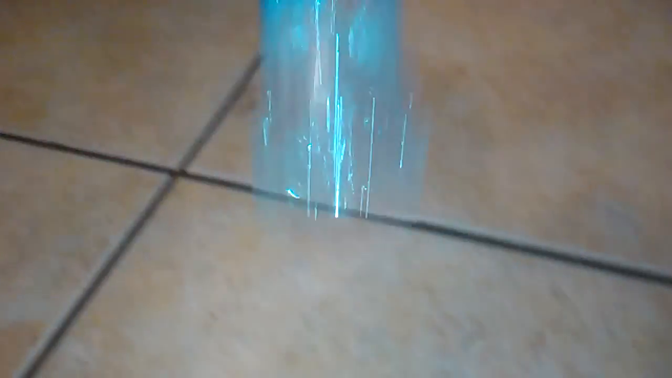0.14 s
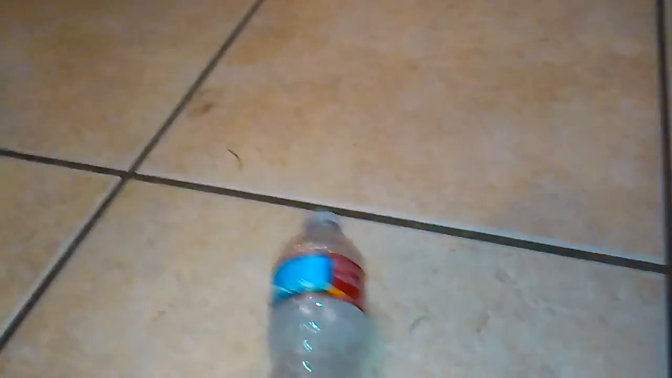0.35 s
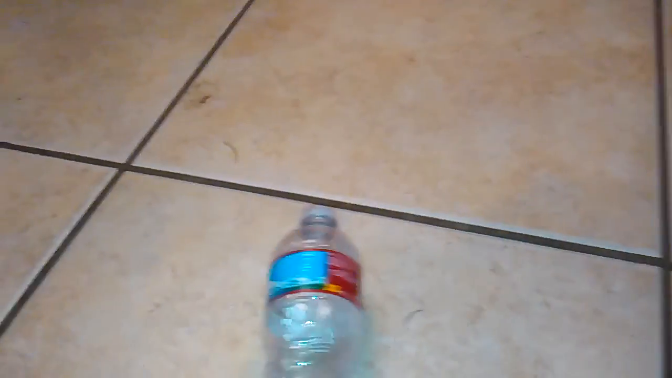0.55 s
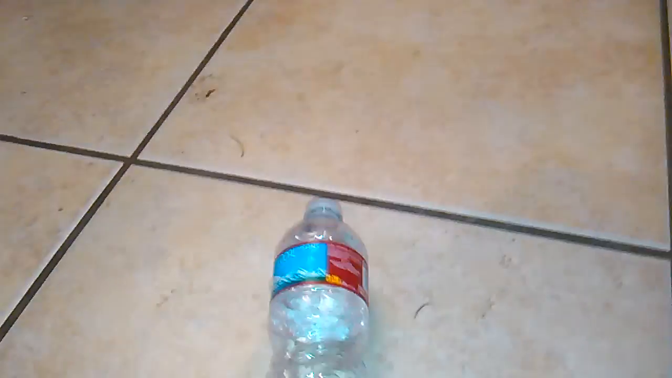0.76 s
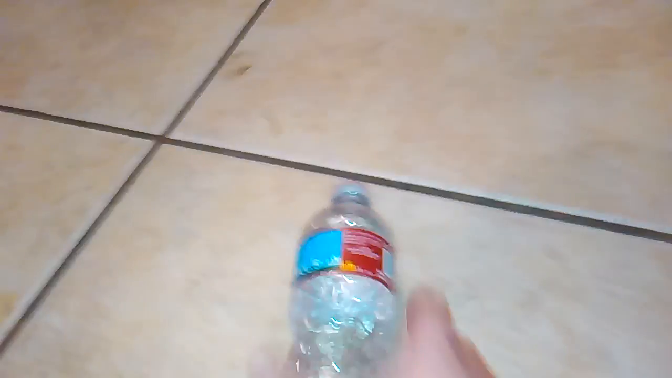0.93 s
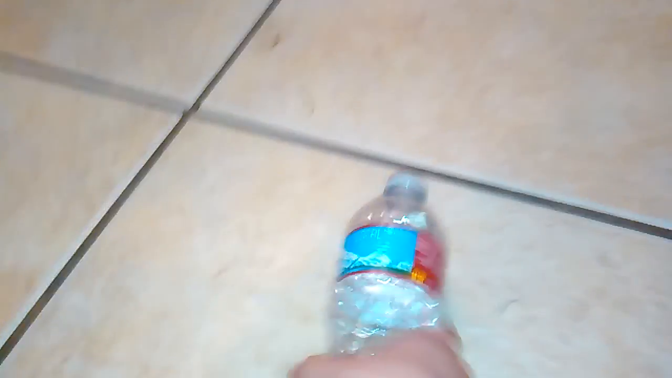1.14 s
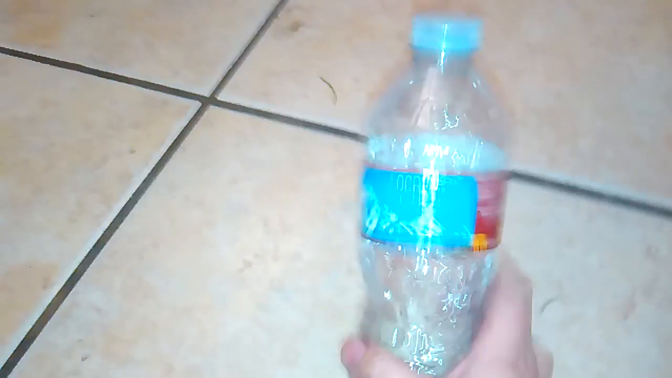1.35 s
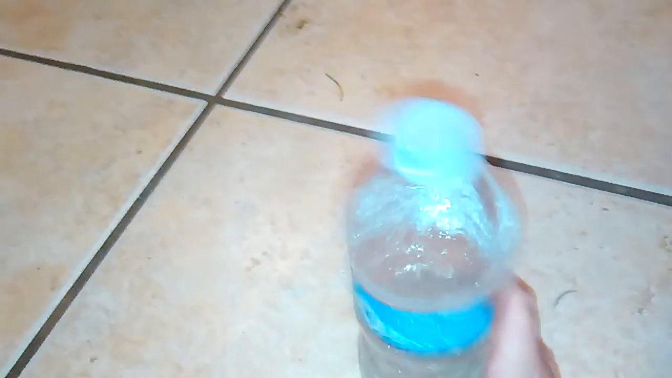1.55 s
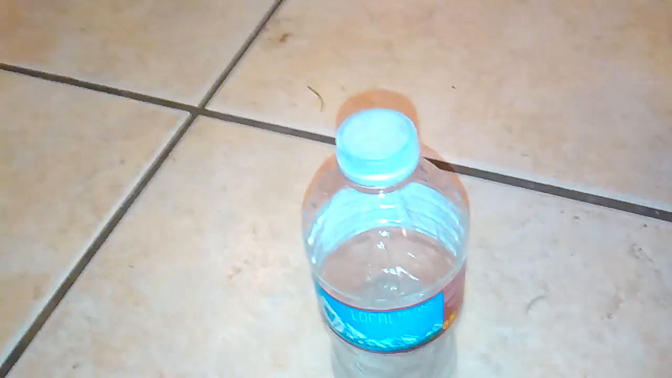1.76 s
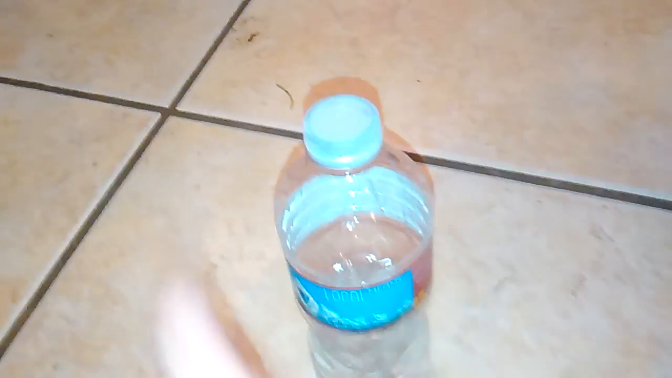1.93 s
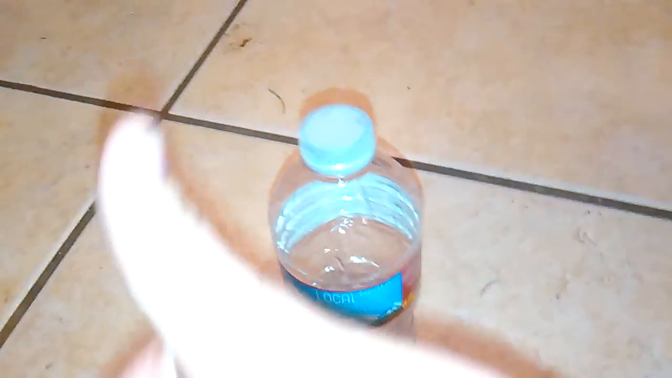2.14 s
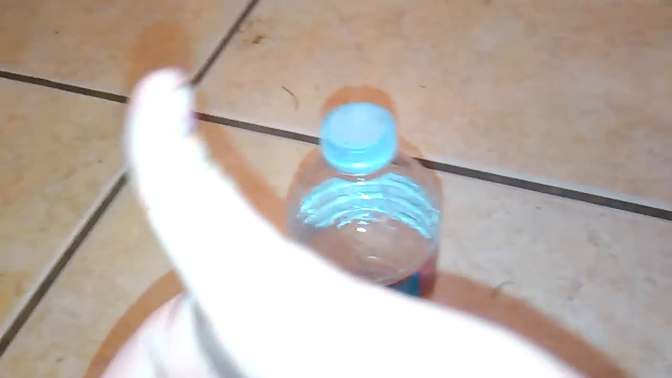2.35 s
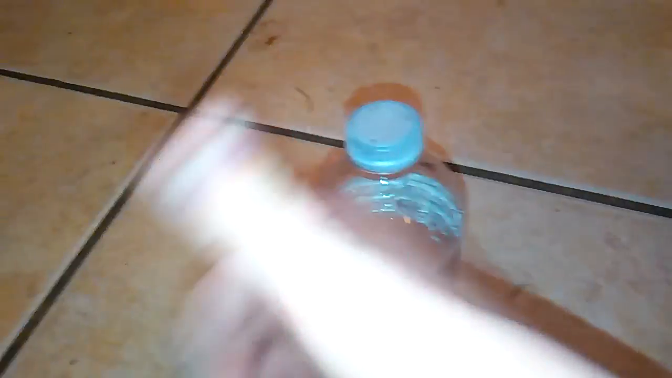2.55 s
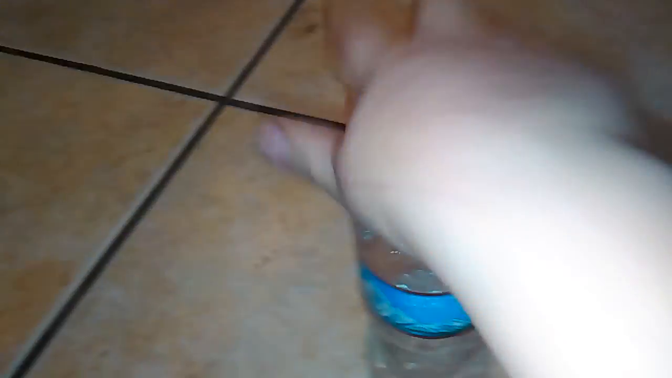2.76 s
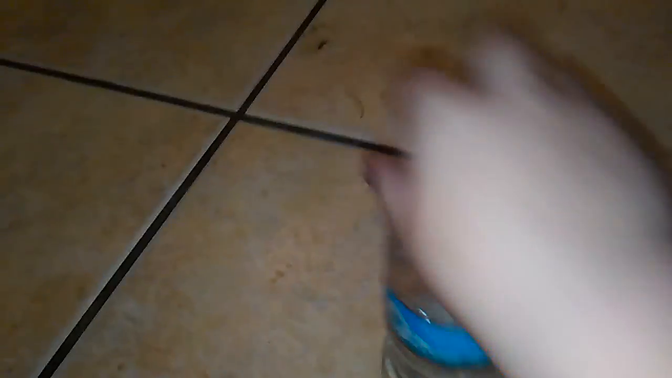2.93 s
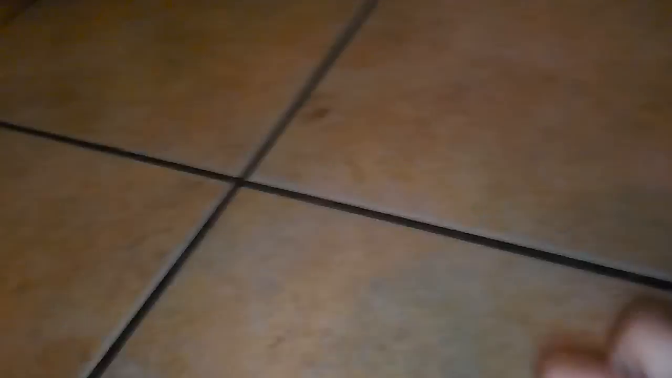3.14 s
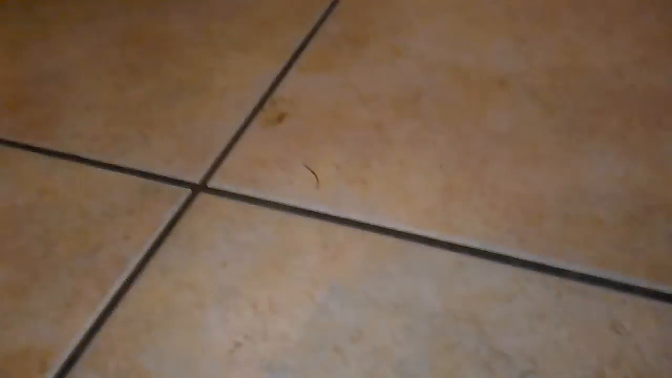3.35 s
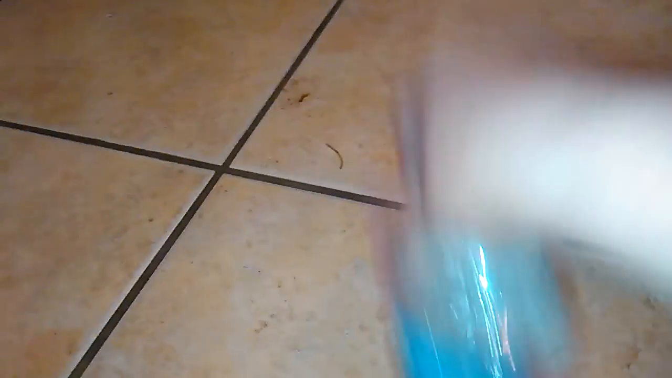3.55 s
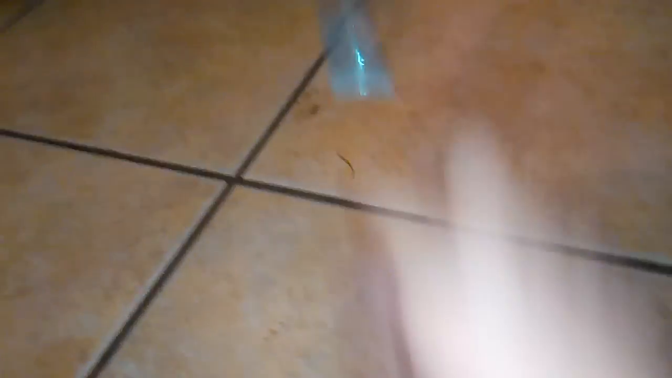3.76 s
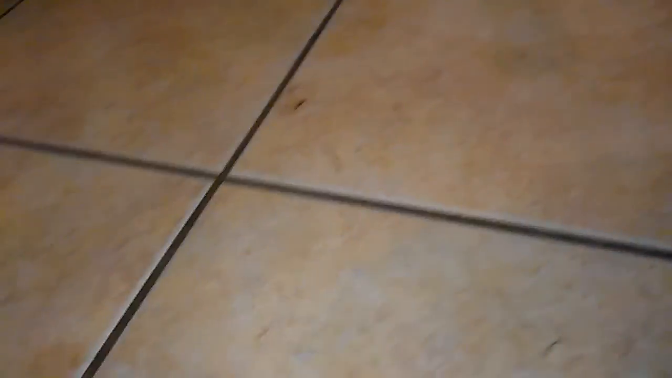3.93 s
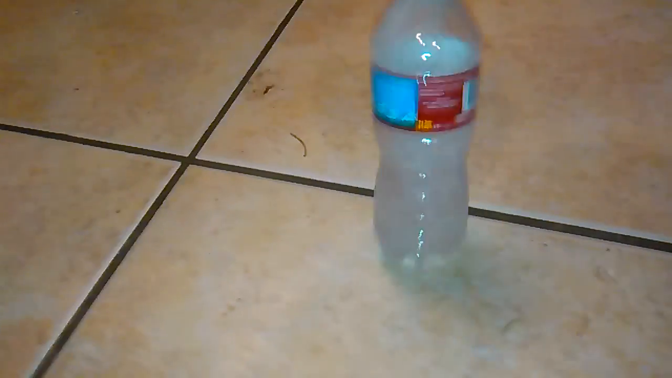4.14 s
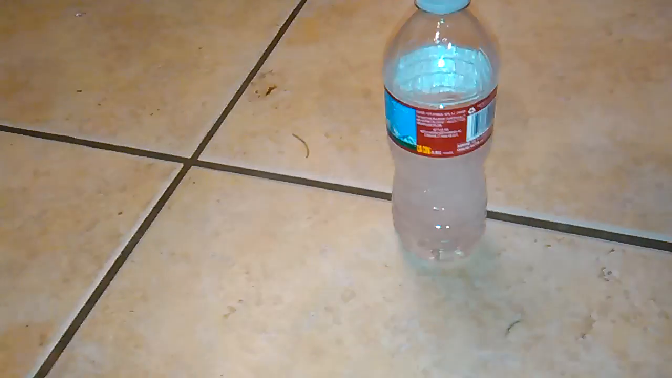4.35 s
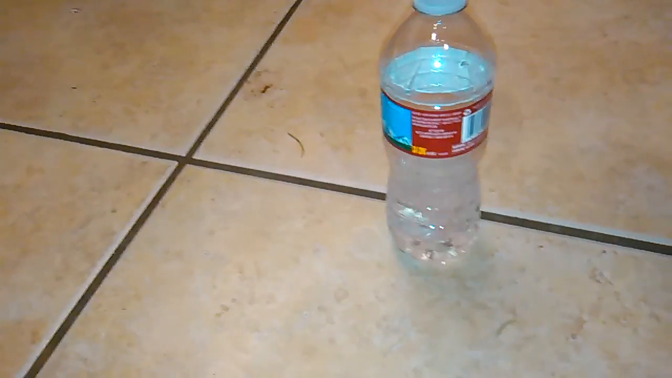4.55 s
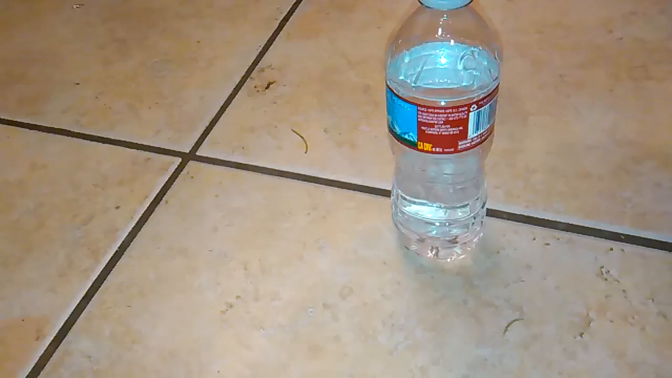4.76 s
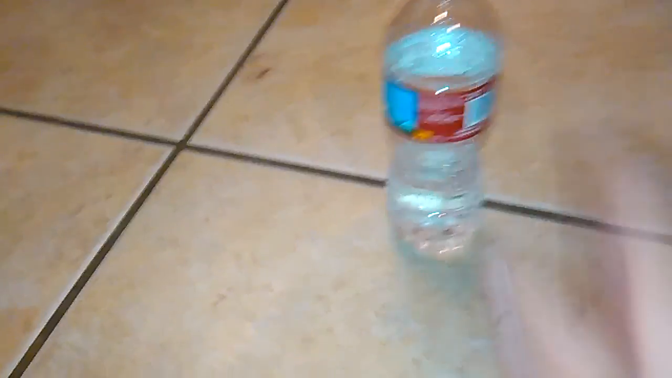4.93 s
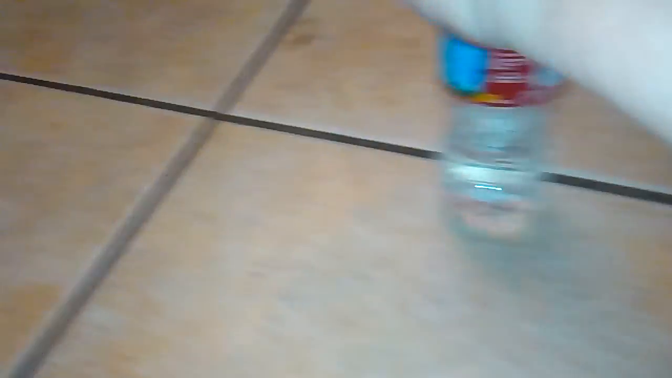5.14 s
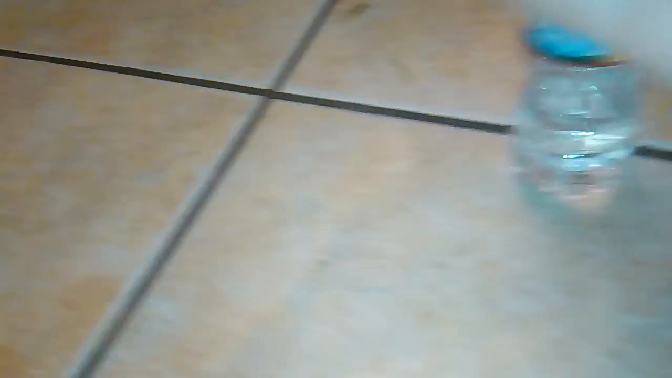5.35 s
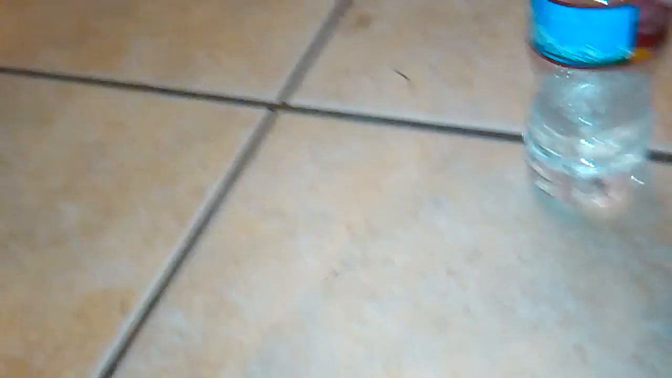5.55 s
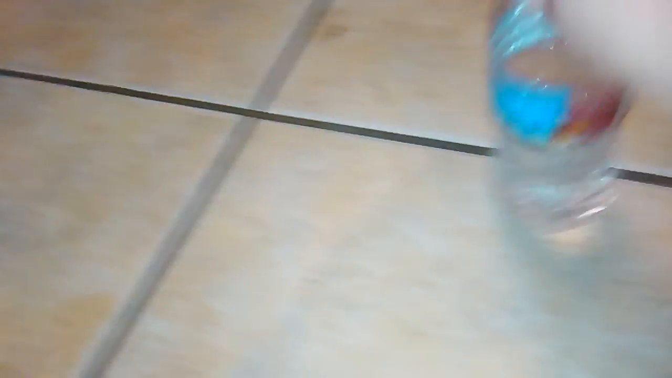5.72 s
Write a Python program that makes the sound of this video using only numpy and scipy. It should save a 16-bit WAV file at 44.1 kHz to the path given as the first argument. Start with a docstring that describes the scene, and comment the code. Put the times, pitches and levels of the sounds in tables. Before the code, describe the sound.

A small tiled room with faint low mains hum and soft hush. Light plastic crinkling and ticks come first, then at 0.3 s a part-filled bottle hits the floor: a loud, hollow, cracking thunk with a second bounce within 0.05 s, a thin ring hanging on, and a blunt tap at the right microphone at 0.4 s. Quiet follows, with a tiny gurgle at 1.1 s, dull hand knocks at 1.5 s and brief crinkling to 1.8 s. Soft bumps and faint slosh come at 2.7-3.0 s. At 3.75 s water gulps upward in pitch, with a knock at 3.8 s and small dent pops near 4.0 s. The second landing at 4.2 s is a heavier, watery cluster of thunks, its slosh fading over half a second. Handling knocks, a barely audible squeak and slosh come around 5.5 s, then a crisp dent snap at 5.8 s. Short bright reverberation; sound leans right, left duller.

```python
"""In a small tiled room, a thin plastic bottle partly filled with water is flipped twice and lands on the floor.
Landings, knocks and dents excite damped modes of water, belly, wall and ribs, with noise bursts for buckling.
Between throws a hand grabs and crinkles it: resonant grains give the crinkling and the sloshing water.
Sine-wave mains hum and coloured noise fill the room, whose reverberation is convolved with decaying noise.
The left microphone is shaded and dull, the right one bright."""
import sys
import numpy as np
from scipy import signal
from scipy.fft import rfft, irfft, next_fast_len
from scipy.io import wavfile
from scipy.ndimage import uniform_filter1d

SR = 44100
rng = np.random.default_rng(int(sys.argv[2]) if len(sys.argv) > 2 else 0)


def pcm_store(signal):
    """Save signal as 16-bit PCM."""
    levels = np.round(np.clip(np.atleast_2d(signal), -1, 1) * 32767)
    wavfile.write(sys.argv[1], SR, levels.astype(np.int16).T)


N = 259749
TIME = np.arange(N) / SR  # whole scene [s]
AGE = np.arange(int(.25 * SR)) / SR  # time since the start of one event [s]

# Colour of the plastic as it buckles: (frequency [Hz], gain [dB])
BUCKLE_COLOUR = [(300, -24), (700, -11.5), (1200, 0.5), (1900, 5), (3000, -1), (4500, -2.5), (7000, -11),
                 (14000, -28)]


def from_db(db):
    """Amplitude gain is the antilogarithm of a twentieth of the level in decibels."""
    return 10 ** (np.asarray(db) / 20)


def at_hz(points, hz):
    """Linear interpolation along a logarithmic frequency axis."""
    f, value = np.transpose(points)
    return np.interp(np.log(np.maximum(hz, 1)), np.log(f), value)


def rms_one(x, size=None):
    """Normalisation: the first `size` samples (or all) are given a root mean square of 1."""
    return x / np.sqrt(np.mean(x[..., :size] ** 2) + 1e-20)


def add(track, s, sound):
    """Superposition: a sound is summed into a track from time s."""
    i = max(int(round(s * SR)), 0)
    track[i:i + len(sound)] += sound[:max(N - i, 0)]


def colour(x, points):
    """Minimum-phase filtering: folding the cepstrum makes the given dB curve causal."""
    size = 4096
    gain_db = at_hz(points, np.fft.rfftfreq(size, 1 / SR))
    cepstrum = irfft(np.log(from_db(gain_db)), size)
    cepstrum[1:size // 2] *= 2
    cepstrum[size // 2 + 1:] = 0
    response = irfft(np.exp(rfft(cepstrum)), size)
    response = response.reshape((1,) * (x.ndim - 1) + (-1,))
    return signal.oaconvolve(x, response, axes=-1)[..., :x.shape[-1]]


def diffuse(size):
    """Diffuse-field coherence: stereo white noise, alike in the bass and unrelated in the treble."""
    # Likeness of the two channels: (frequency [Hz], correlation [-1 to 1])
    likeness = [(130, 0.82), (300, 0.8), (620, 0.19), (1400, 0)]
    padded = next_fast_len(size, real=True)
    mid, side = rfft(rng.standard_normal((2, padded)))
    alike = np.clip(at_hz(likeness, np.fft.rfftfreq(padded, 1 / SR)), -1, 1)
    common = np.sqrt((1 + alike) / 2) * mid
    opposed = np.sqrt((1 - alike) / 2) * side * [[1], [-1]]
    return irfft(common + opposed, padded)[:, :size]


def snaps(size, per_s, spread_db):
    """Random impulse process: clicks at chance moments, of uneven strength and either sign."""
    strength = from_db(spread_db * np.minimum(rng.exponential(1, size), 4))
    return (rng.random(size) < per_s / SR) * strength * rng.choice([-1, 1], size)


def crumple(seconds):
    """Impulsive excitation: a flurry of tiny buckles decays exponentially, with total energy 1."""
    flurry = snaps(len(AGE), per_s=9000, spread_db=5.5) * np.exp(-AGE / max(seconds, .001))
    return flurry / (np.linalg.norm(flurry) + 1e-12)


def resonate(x, hz, width):
    """Damped resonance: a two-pole filter whose bandwidth is a share of its pitch."""
    r = np.exp(-np.pi * width * hz / SR)
    return signal.lfilter([1, 0, -1], [1, -2 * r * np.cos(2 * np.pi * hz / SR), r * r], x + 1e-18)


def grains(clicks, pitches, width):
    """Granular excitation: every click is dealt to one of the resonances, where it rings briefly."""
    dealt = rng.integers(0, len(pitches), N)
    return sum(resonate(clicks * (dealt == k), hz, width) for k, hz in enumerate(pitches))


def ring(low, high, centre_hz, damping, focus_db=0, vary_db=0, detune=0, below_db=0):
    """Modal synthesis: damped sines, weighted by the struck spot and detuned by the lie of the water.

    damping is in dB per s; focus_db and below_db are losses per octave from, and further below, centre_hz."""
    # Bottle modes, from water mass to stiff wall and ribs:
    # (nominal frequency [Hz], relative level [dB], t60 before extra damping [s])
    bottle_modes = [(61, -12, .3), (86, 0, .08), (140, -4, .1), (189, 0, .13), (218, -9, .05),
                    (259, -7, .08), (338, -4, .08), (404, -10, .08), (459, -7, .09), (650, -7, .06),
                    (745, -2, .05), (818, 0, .08), (885, -4, .05), (965, -4, .05), (1092, -3, .07),
                    (1178, -4, .07), (1310, -9, .04), (1600, -2, .03), (1800, 0, .035), (2060, -1, .03),
                    (2450, -3, .03), (2760, -4, .03), (3200, -6, .025), (3750, -2, .025), (4300, -5, .02),
                    (5250, -6, .02)]
    in_range = [mode for mode in bottle_modes if low <= mode[0] < high]
    hz, level_db, t60 = np.transpose(in_range)[:, :, None]
    octaves = np.log2(hz / centre_hz)
    strength_db = level_db - focus_db * np.abs(octaves) + below_db * np.minimum(octaves, 0)
    strength_db = strength_db + vary_db * rng.standard_normal(hz.shape)
    hz = hz * (1 + detune * rng.uniform(-1, 1, hz.shape))
    decay_db = (60 / t60 + damping) * AGE
    return np.sum(from_db(strength_db - decay_db) * np.sin(2 * np.pi * hz * AGE), axis=0)


def shaken(modes, seconds, rough):
    """Convolution: modes answer one firm contact and the flurry of buckles that follows it."""
    return modes + rough * signal.fftconvolve(modes, crumple(seconds))[:len(AGE)]


def blow(thump_db, belly_db, wall_db, rib_db, crack_db, seconds, belly_hz, wall_hz,
         damping=0, belly_give_s=0.00044, give_s=.0012, water_lag_s=.002):
    """Impact excitation: one blow moves water, flexes belly, rings wall and ribs, and cracks thin plastic."""
    # Slap of water against the wall: (frequency [Hz], gain [dB])
    slap_colour = [(100, 2), (250, 5), (550, -6.5), (800, -2), (1150, -3), (1600, -17.5), (3000, -20.5),
                   (8000, -39)]
    # Cracking plastic: (frequency [Hz], gain [dB])
    crack_colour = [(1500, -33.5), (3500, -22.5), (5500, -6), (7500, -2.5), (9000, 0), (11000, -5.5),
                    (14500, -15.5)]
    water, belly, wall, ribs = (0, 150), (150, 550), (550, 1450), (1450, 6000)  # mode ranges [Hz]

    # soft plastic yields before it pushes back
    give = 1 - np.exp(-AGE / give_s)
    belly_give = 1 - np.exp(-AGE / belly_give_s)
    water_rise = 1 - np.exp(-AGE / water_lag_s)

    # the favoured rib pitch climbs an octave per 9.5 dB of crack over wall
    rib_hz = 2090 * 2 ** ((crack_db - wall_db) / 9.5)
    water_ring = ring(*water, belly_hz, damping)
    belly_ring = ring(*belly, belly_hz, damping, focus_db=5.0, vary_db=1.8, detune=.025, below_db=9)
    wall_ring = ring(*wall, wall_hz, damping, focus_db=7, vary_db=2.0, detune=.012)
    rib_ring = ring(*ribs, rib_hz, damping, focus_db=5, vary_db=2.0, detune=.08)

    # the wet wall slaps broadly around its strongest mode
    slap = colour(resonate(crumple(1.4 * seconds), wall_hz, width=1.1), slap_colour)
    # ribs mostly buckle and only half ring
    buckling = rms_one(colour(crumple(1.7 * seconds), BUCKLE_COLOUR))
    buckling = buckling + .4 * rms_one(shaken(rib_ring, seconds, rough=1.8))
    crack = give * colour(crumple(1.1 * seconds), crack_colour)

    parts = [(thump_db - 4.5, water_rise * water_ring),
             (belly_db - 4.0, belly_give * shaken(belly_ring, seconds, rough=0.38)),
             (wall_db - 3.0, give * shaken(wall_ring, seconds, rough=0.65)),
             (wall_db - 1.0, slap),
             (rib_db - 3.5, buckling),
             (crack_db - 9, crack)]
    return sum(from_db(db) * rms_one(part, size=900) for db, part in parts)


def background():
    """Stationary sources: harmonic mains hum over the soft rumble and hiss of a quiet room."""
    # Mains hum: (frequency [Hz], rms level before the channel trim [dB])
    hum_partials = [(60, -73.5), (120, -70.5), (180, -85), (240, -81.5), (300, -94), (360, -89)]
    # Room hush: (frequency [Hz], gain [dB])
    hush_colour = [(20, -18), (35, -9.5), (62, -4.5), (95, -3.5), (140, -6), (250, -13), (500, -18),
                   (1000, -26.5), (2000, -28.5), (4500, -33), (7000, -33), (10000, -29.5), (14500, -30.5)]
    hum = 0
    for hz, db in hum_partials:
        phase = rng.random()  # radians after the factor of 2 pi
        hum = hum + from_db(db) * np.sqrt(2) * np.sin(2 * np.pi * (hz * TIME + phase))
    hush = from_db(-68.5) * rms_one(colour(diffuse(N), hush_colour))
    # channel trims [dB], left then right
    return hum * from_db([[-1.2], [.6]]) + hush * from_db([[-.6], [.6]])


def knocks(crumple_s=0.0064, unevenness=.25, count=7):
    """Damped impact: a held bottle flexes mainly at the belly, then its base rocks in ever lighter touches."""
    # Dull knocks as the hand grabs, nudges or sets down the bottle: (time [s], relative belly level [dB],
    # relative wall level [dB], relative crack level [dB], strongest belly mode [Hz], rocking decay time [s])
    knock_table = [(0.0034, -48.5, -65, -62, 209, 0.0042), (1.5053, -31.5, -51.5, -49, 336, 0.04),
                   (1.5130, -30, -45.5, -40, 157, 0.02), (2.006, -54.5, -79, -80, 190.4, 0.0041),
                   (2.7020, -40, -52.5, -64, 275, 0.0028), (2.7178, -33, -43, -55.5, 250, 0.017),
                   (2.8604, -38.5, -56.5, -48, 185, 0.0044), (3.0394, -45, -71, -68, 250, .003),
                   (3.8246, -29, -47.5, -56.5, 200, 0.01), (5.472, -49.5, -68.5, -63.5, 183, 0.012),
                   (5.5276, -35, -48.5, -66, 358, 0.063), (5.8058, -44.5, -52.5, -51.5, 306, .005)]
    wall_hz, hand_damping_db_per_s, finger_give_s = 670, 799.5, .0035
    rock_gap_s, rock_db = 0.019, -3  # mean gap; touch level before the rocking decay
    out = np.zeros(N)
    for s, belly_db, wall_db, crack_db, belly_hz, rocking_s in knock_table:
        # a knock low on the belly moves more water
        thump_db = belly_db - 12 - 16.5 * np.log2(belly_hz / 200)
        rib_db = (wall_db + crack_db) / 2 - 11.5
        knock = blow(thump_db, belly_db, wall_db, rib_db, crack_db, crumple_s, belly_hz, wall_hz,
                     hand_damping_db_per_s, finger_give_s)
        add(out, s, knock)
        gaps = rock_gap_s * (1 + unevenness * rng.uniform(-1.3, 1, count))
        for later in np.cumsum(gaps):
            touch = from_db(rock_db) * np.exp(-later / rocking_s) * knock
            add(out, s + later, rng.choice([-1, 1]) * touch)
    return out


def room(x, build_s=0.0039):
    """Reverberation: reflections off tiles and walls thicken quickly and decay exponentially band by band."""
    # Decay: (frequency [Hz], t60 [s])
    room_t60 = [(60, .42), (250, .35), (1000, .35), (2500, .36), (8000, .29), (14000, .25)]
    # Strength against the direct sound before channel gains: (frequency [Hz], level [dB])
    room_level = [(60, -13), (250, -7), (700, -12.5), (2000, -7.5), (5000, -12), (12000, -8)]
    t = TIME[:SR // 2]
    hz = np.fft.rfftfreq(len(t), 1 / SR)
    noise = rfft(diffuse(len(t)))
    response = 0
    centres = np.geomspace(60, 15000, 9)
    for centre, share in zip(centres, np.eye(len(centres))):
        # overlapping triangular bands on the log-frequency axis
        band = irfft(noise * at_hz(np.c_[centres, share], hz), len(t))
        decay = np.exp(-np.log(1000) * t / at_hz(room_t60, centre)) * (1 - np.exp(-t / build_s))
        response = response + from_db(at_hz(room_level, centre)) * band * decay / np.linalg.norm(decay)
    return signal.oaconvolve(x[None], response, axes=1)[:, :N]


def ticks(width=.22, snap_s=0.0064):
    """Impulse response of a resonance: a crease pops and rings for an instant around its own pitch."""
    # Loudest creases snapping in the wall: (time [s], relative level [dB], pitch [Hz])
    creases = [(0.0812, -49, 10300), (0.152, -53, 9550), (0.2344, -58, 3090), (0.6695, -54, 9200),
               (0.6988, -61.5, 5916), (1.622, -45, 9210), (1.7225, -55.5, 7500), (1.8124, -51.5, 11800),
               (2.8488, -56.5, 7600), (3.7006, -56, 6680), (4.4915, -52.5, 7600), (5.656, -53.5, 8290)]
    out = np.zeros(N)
    for s, level_db, hz in creases:
        pop = rms_one(resonate(crumple(snap_s), hz, width), size=200)
        add(out, s, from_db(level_db - 5.5) * pop)
    return out


def dents():
    """Snap-through buckling: a dent pops in or out, exciting much wall and rib and little belly."""
    # (time [s], relative wall level [dB], relative water thump level [dB], relative rib level [dB],
    # relative crack level [dB], strongest wall mode [Hz])
    dent_table = [(0.0999, -61.5, -58, -58.5, -46.5, 961), (0.1225, -51, -75, -53.5, -55, 1340),
                  (1.6118, -56, -69, -75, -64, 836), (1.6378, -59.5, -52.5, -53.5, -57, 815),
                  (1.6498, -61, -70, -56, -62, 724), (1.666, -56, -64, -71, -81, 1160),
                  (1.7338, -63.5, -71, -58.5, -60, 725), (2.8727, -47.5, -56, -68, -85, 750),
                  (3.991, -43, -38, -55, -43, 1120), (4.028, -39.5, -47.5, -46, -46, 904),
                  (5.785, -42.5, -63.5, -33, -31, 1270)]
    crumple_s, strongest_belly_hz = .005, 250
    out = np.zeros(N)
    for s, wall_db, thump_db, rib_db, crack_db, wall_hz in dent_table:
        belly_db = (thump_db + wall_db) / 2 - 6  # the belly follows water and wall
        dent = blow(thump_db, belly_db, wall_db, rib_db, crack_db, crumple_s, strongest_belly_hz, wall_hz)
        add(out, s, dent)
    return out


def crinkling():
    """Granular emission: fine creases of plastic under the fingers each ring at one of many pitches."""
    # Squeezes, each swelling and fading as a Gaussian: (middle time [s], relative level [dB], half length [s])
    squeezes = [(0.134, -73, .11), (1.16, -79.5, .09), (1.453, -77, .07), (1.65, -66, .07),
                (3.819, -76.5, .14), (4.52, -72.5, .04), (5.558, -88.5, .2)]
    # Crinkling plastic: (frequency [Hz], gain [dB])
    crinkle_colour = [(500, -17), (1100, -1), (2300, 0.5), (4000, -11.5), (6000, -2), (9000, 6.5),
                      (14500, -7)]
    pitches = np.linspace(1100, 12500, num=14)
    creases = grains(snaps(N, per_s=700, spread_db=5.0), pitches, width=.16)
    grip = sum(from_db(db) * np.exp(-((TIME - s) / seconds) ** 2) for s, db, seconds in squeezes)
    return from_db(7.0) * grip * rms_one(colour(creases, crinkle_colour))


def landings():
    """Free vibration after impact: the loose bottle strikes the tiles and rings without a hand's damping."""
    # One row per contact as the base hits and bounces: (time [s], relative wall level [dB],
    # relative water thump level [dB], relative crack level [dB], crumple time scale [s],
    # strongest wall mode [Hz])
    contacts = [(0.3193, -20.5, -25.5, -27.5, 0.0085, 778), (0.3277, -25.5, -16, -31, 0.015, 755),
                (0.3506, -35.5, -33, -32, 0.032, 812.5), (0.3689, -26.5, -28, -26, 0.0013, 799),
                (0.3771, -28, -23, -26, 0.0045, 746), (4.2117, -21, -26.5, -21.5, .01, 643),
                (4.2161, -18.5, -11.5, -24, .004, 864), (4.2256, -23, -19.5, -28.5, 0.0047, 1156),
                (4.2359, -32.5, -26, -28, .005, 859)]
    strongest_belly_hz = 192
    out = np.zeros(N)
    for s, wall_db, thump_db, crack_db, seconds, wall_hz in contacts:
        # the belly follows water and wall, the ribs follow wall and crack
        belly_db = (thump_db + wall_db) / 2 + 3.5
        rib_db = (wall_db + crack_db) / 2 - 7.5
        contact = blow(thump_db, belly_db, wall_db, rib_db, crack_db, seconds, strongest_belly_hz, wall_hz)
        add(out, s, contact)
    return out


def lingering_ring():
    """Lightly damped mode: a thin ring hangs on after the first landing, decaying exponentially."""
    # One ring: (start time [s], relative level [dB], frequency [Hz], t60 [s])
    lingering = (.33, -44, 943, .62)
    s, db, hz, t60 = lingering
    age = np.maximum(TIME - s, 0)
    return from_db(db) * np.exp(-np.log(1000) * age / t60) * np.sin(2 * np.pi * hz * age)


def port_tap(s=.416, spike_db=-3, spike_s=0.00046, swing_db=-7, swing_hz=54, swing_s=0.0094, click_db=3):
    """Pressure transient: a tap right at one microphone port gives a spike, then a slow swing back."""
    out = np.zeros(N)
    swing = -from_db(swing_db) * np.sin(2 * np.pi * swing_hz * AGE) * np.exp(-AGE / swing_s)
    add(out, s, swing)
    add(out, s - .0005, from_db(click_db) * colour(crumple(0.0015), BUCKLE_COLOUR))
    return out + from_db(spike_db) * np.exp(-np.abs(TIME - s) / spike_s)


def sloshing(wobble=0.11):
    """Bubble resonance: small bubbles ring in rocking water, and larger gulps rise unsteadily in pitch."""
    # Pushes that set the water rocking: (time [s], relative level [dB])
    sloshes = [(1.118, -65.5), (2.742, -67), (2.938, -64.5), (4.33, -52.5), (5.42, -66.5), (5.551, -56.5)]
    # Air pockets gulping as the bottle tips: (time [s], relative level [dB], nominal starting pitch [Hz],
    # mean pitch rise [octaves per s], time to the swell's peak [s])
    gulps = [(1.096, -61, 761, 3.7, 0.0077), (3.747, -53, 773, 2.7, 0.037), (3.779, -44, 926, 12, 0.0033)]
    surge_db_per_s, settle_db_per_s = 199, 75  # quick rise, slow fall
    bubbles = grains(snaps(N, per_s=940, spread_db=4.0), np.geomspace(280, 1000, num=12), width=0.11)
    unrest = 0
    for s, db in sloshes:
        loss_db = np.maximum(surge_db_per_s * (s - TIME), settle_db_per_s * (TIME - s))
        unrest = unrest + from_db(db - loss_db)
    out = unrest * rms_one(bubbles)
    for s, db, hz, rise, seconds in gulps:
        swell = (AGE / seconds) ** 2 * np.exp(1 - (AGE / seconds) ** 2)
        unsteady = uniform_filter1d(rng.standard_normal(len(AGE)), size=60)
        pitch = hz * 2 ** (rise * AGE + wobble * rms_one(unsteady))
        add(out, s, from_db(db) * swell * np.sin(2 * np.pi * np.cumsum(pitch) / SR))
    return out


def squeak(width=0.025):
    """Friction-excited resonance: a fingertip skids on plastic in a faint, rough whistle that swells and fades."""
    # One skid: (middle time [s], relative level [dB], pitch [Hz], Gaussian half length [s])
    skid = (5.47, -77, 2900, .05)
    s, db, hz, seconds = skid
    whistle = rms_one(resonate(rng.standard_normal(N), hz, width))
    return from_db(db) * np.exp(-((TIME - s) / seconds) ** 2) * whistle


def scene():
    """Interaural-style cues: the bottle is to the right, so its direct sound is later, weaker, duller at left."""
    # Shading of the left microphone against the right: (frequency [Hz], gain [dB])
    left_shade = [(60, -0.5), (200, 1), (400, 2.5), (700, -4.5), (1250, -11.5), (2300, -6.5), (4200, -1),
                  (6000, -19), (8000, -22.5), (14000, -19.5)]
    bottle = knocks() + ticks() + dents() + crinkling() + landings() + lingering_ring() + sloshing() + squeak()
    wet_left, wet_right = room(bottle)
    late = np.interp(TIME - .00008, TIME, bottle)  # 0.08 ms later
    left = colour(from_db(-5.0) * late + from_db(-2.5) * wet_left, left_shade)
    right = bottle + wet_right + port_tap()
    return np.array([left, right]) + background()


def record(dry, low_cut_hz=40, cutoff_hz=14300):
    """Band limiting and soft saturation: deepest bass rolled off, loudest peaks rounded, top cut."""
    thinned = signal.sosfilt(signal.butter(3, low_cut_hz, "high", fs=SR, output="sos"), dry)
    rounded = 1.3 * np.tanh(thinned / 1.3)
    return signal.sosfilt(signal.ellip(10, .1, 80, cutoff_hz, fs=SR, output="sos"), rounded)


dry = scene()
out = record(dry)
pcm_store(out)
```